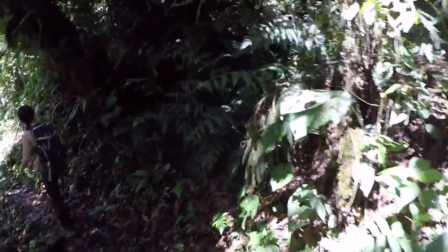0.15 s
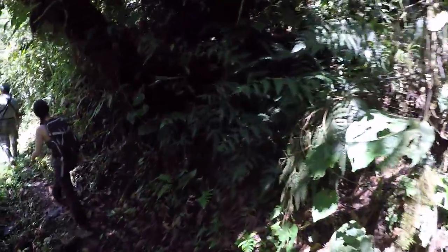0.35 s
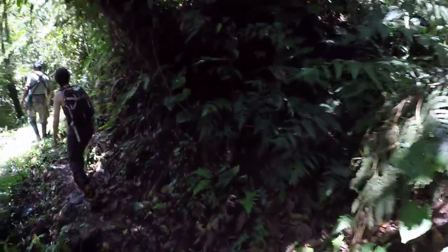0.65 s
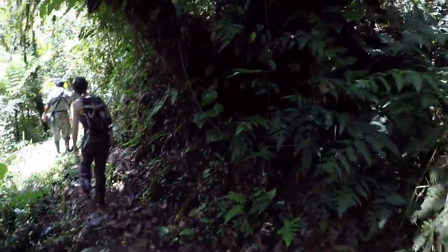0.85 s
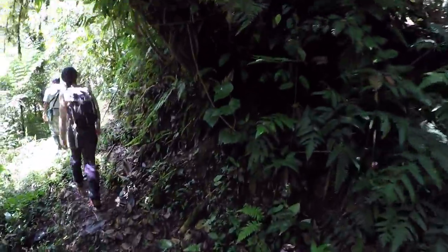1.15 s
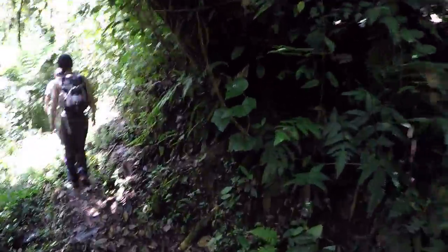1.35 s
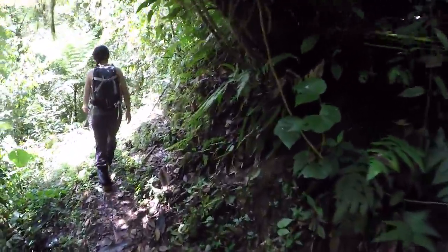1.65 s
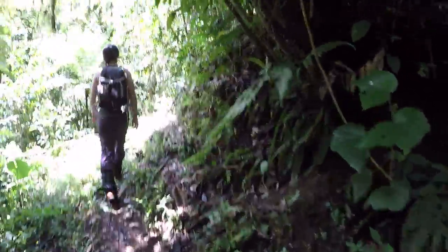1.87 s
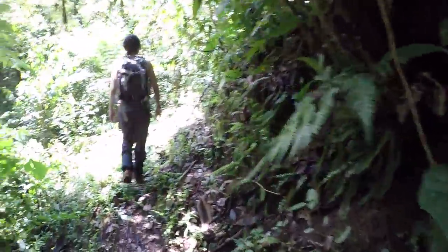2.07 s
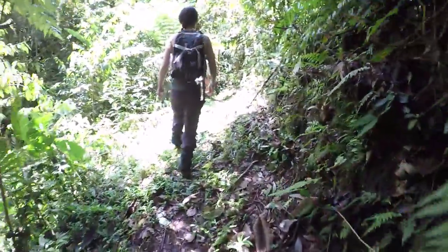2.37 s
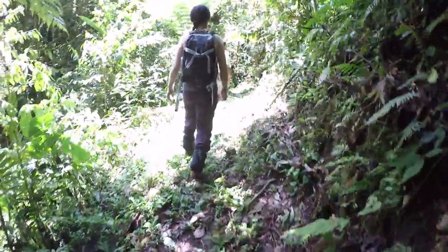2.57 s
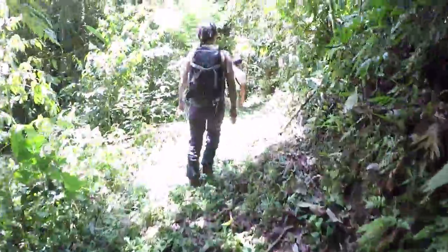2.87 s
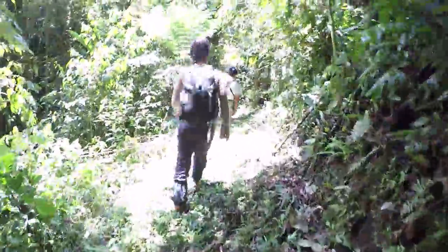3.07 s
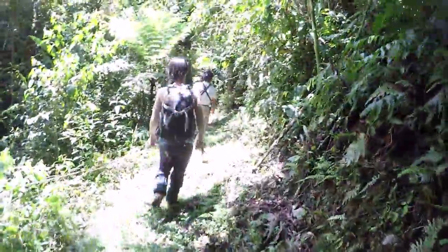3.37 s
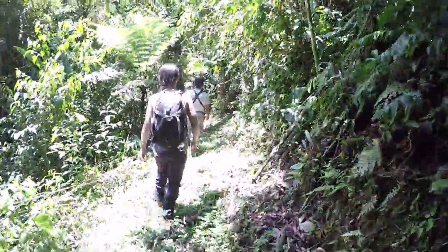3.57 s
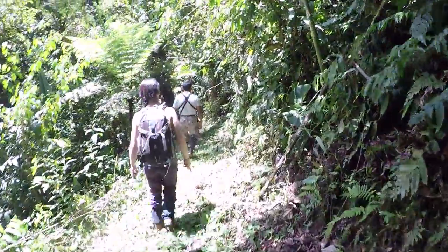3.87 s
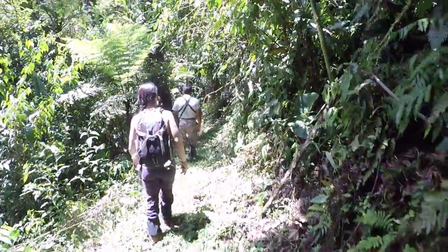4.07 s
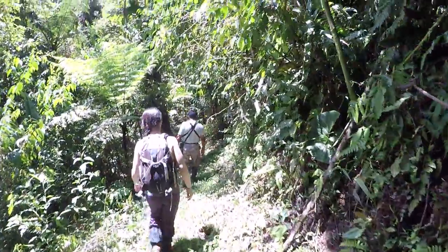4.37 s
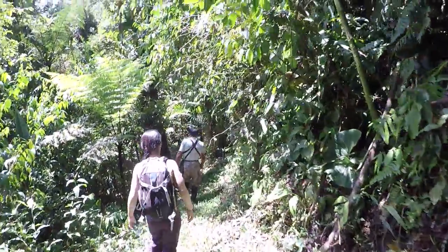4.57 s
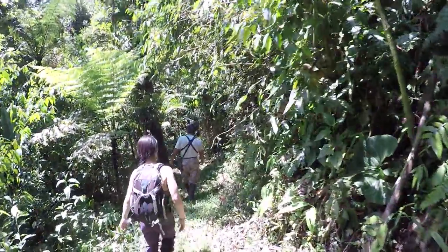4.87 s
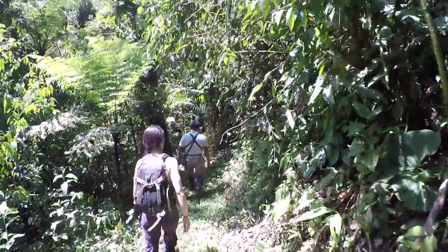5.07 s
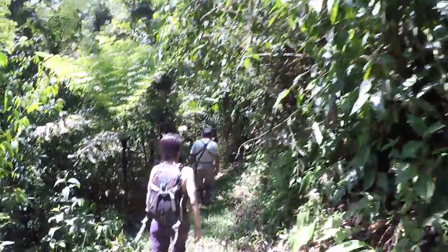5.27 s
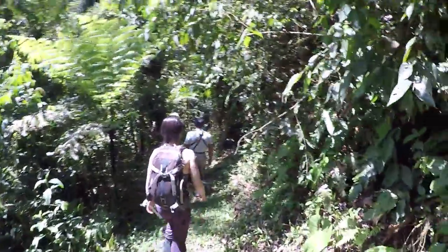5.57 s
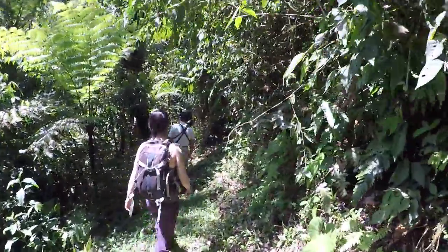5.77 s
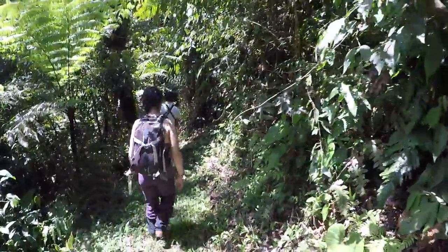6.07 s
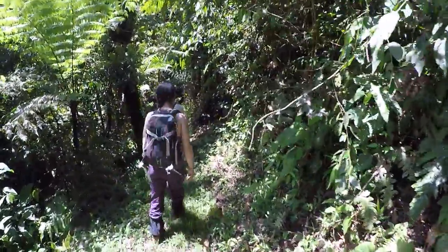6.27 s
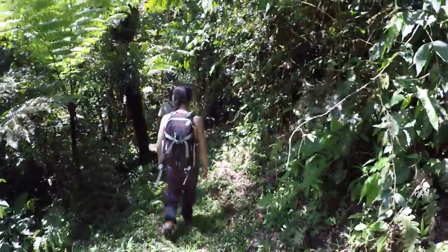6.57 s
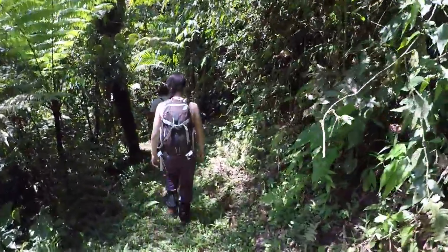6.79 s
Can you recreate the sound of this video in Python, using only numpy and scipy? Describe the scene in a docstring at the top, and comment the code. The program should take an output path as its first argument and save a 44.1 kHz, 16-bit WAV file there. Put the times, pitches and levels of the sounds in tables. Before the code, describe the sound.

Loud shrill cicada chorus in dense forest fades, then swells to a piercing buzz, with soft footsteps, dry ticks and handling rubs close by.

```python
"""Dense tropical forest, on a trail: cicadas shrill in a chorus that fades, then swells as a hand-held camera
follows walkers. Far off, fast tymbal clicks blur among the trees; near singers are click trains ringing
a hollow abdomen, heard as combs of thin, slowly sagging tones, with single harmonics flaring up.
Close by are soft steps (damped booms over crushed earth), a few ticks, brushed leaves, and two faint raspy
creaks within the rustling, perhaps of a strap. At the two microphone ports lie gritty rubs on the camera body,
its low whirr and handling rumble; far foliage hisses behind."""
import sys
import numpy as np
from scipy import signal
from scipy.fft import rfft, irfft, next_fast_len
from scipy.io import wavfile
from scipy.ndimage import map_coordinates

SR = 44100
rng = np.random.default_rng(int(sys.argv[2]) if len(sys.argv) > 2 else 0)


def unload_wav(signal):
    """Save mono or channel-first audio to the path in sys.argv[1] as 16-bit WAV at rate SR, clipped to [-1, 1]."""
    wavfile.write(
        sys.argv[1],
        SR,
        np.round(np.clip(np.atleast_2d(signal).T, -1, 1) * 32767).astype(np.int16),
    )


N = 305603  # length [samples]


def amp(db):
    """Decibels to gain."""
    return 10 ** (np.asarray(db) / 20)


def unit(x):
    """Scaled to rms 1."""
    return x / np.sqrt(np.mean(x ** 2) + 1e-20)


def along(points, hz):
    """Each column after the frequency, read on a log axis."""
    f, *cols = np.transpose(points)
    return [np.interp(np.log(hz + 1), np.log(f + 1), c) for c in cols]


def curves(rows):
    """One value per sample for each column after the time."""
    s, *cols = np.transpose(rows)
    return [np.interp(np.arange(N) / SR, s, c) for c in cols]


def wobble(rate):
    """A smooth random curve, rate knots a second."""
    knots = rng.standard_normal(int(N * rate / SR) + 4)
    return map_coordinates(knots, [np.arange(N) * rate / SR], order=2)


def filtered(x, response):
    """x times a complex response of frequency."""
    size = next_fast_len(N + 8192)
    return irfft(rfft(x, size) * response(np.fft.rfftfreq(size, 1 / SR)), size)[..., :N]


def coloured(x, spectrum):
    """x shaped by (frequency [Hz], gain [dB]) points."""
    return filtered(x, lambda hz: amp(along(spectrum, hz)[0]))


def noise():
    """Two unrelated white noises."""
    return rng.standard_normal((2, N))


def gritty(spread_db, grain_rate):
    """Noise broken into grains of uneven size."""
    return noise() * amp(spread_db * wobble(grain_rate))


def at_ports(pair, field):
    """Two unrelated signals reach the left and right ports with the field's coherence, phase and balance; rms 1."""
    def response(hz, sign):
        alike, lead, tilt_db = along(field, hz)
        share = np.sqrt((1 + sign * np.clip(alike, 0, 1)) / 2)
        left = amp(tilt_db / 2) * np.exp(.5j * lead)
        power = abs(left) ** 2 + abs(left) ** -2
        return share * np.array([left, sign / left]) / np.sqrt(power)

    in_step = filtered(pair[0], lambda hz: response(hz, 0.89))
    opposed = filtered(pair[1], lambda hz: response(hz, -0.99))
    return unit(in_step + opposed)


def swell(s, db, length):
    """A bell-shaped rise and fall around time s, its half length 2 ms or more."""
    return amp(db) * np.exp(-.5 * ((np.arange(N) / SR - s) / max(abs(length), .002)) ** 2)


def stroke(start, end, edge):
    """Rises, holds and falls, with ramps centred on start and end."""
    t = np.arange(N) / SR
    return np.clip(.5 + np.minimum(t - start, end - t) / max(edge, .001), 0, 1)


def click_train(at, spread_db):
    """Clicks of uneven size at the given fractional sample times."""
    at = at[(at >= 0) & (at < N - 1)]
    whole, part = at.astype(int), at % 1
    sizes = amp(spread_db * rng.standard_normal(len(at)))
    # each click is shared between its two neighbouring samples
    train = np.bincount(whole, sizes * (1 - part), N) + np.bincount(whole + 1, sizes * part, N)
    return train - train.mean()


def cracks(rate):
    """Two streams of irregular cracks, rate a second; rms 1."""
    count = int(rate * N / SR)
    return unit(np.array([click_train(rng.uniform(0, N, count), spread_db=3.5) for _ in range(2)]))


def echoes(t60, direct):
    """The paths from one perch: a direct one and a tail scattered by the trees."""
    t = np.arange(SR // 3) / SR
    paths = unit(rng.standard_normal(len(t)) * amp(-60 * t / t60)) / np.sqrt(len(t))
    paths[0] += direct
    return paths


def tymbals(click_rate, jitter, forest_t60, count):
    """Two groups of count far insects, each clicking at its own wandering rate."""
    groups = np.zeros((2, N))
    for group in groups:
        for _ in range(count):
            rate = click_rate * np.exp(rng.normal(0, .15))
            order = np.arange(int(1.2 * rate * N / SR))
            drift = .05 * np.sin(2 * np.pi * (order / rate * rng.uniform(.1, .4) + rng.random()))
            at = np.cumsum(1 + drift + rng.normal(0, jitter, len(order))) / rate * SR
            clicks = click_train(at, spread_db=2)
            group += signal.oaconvolve(clicks, echoes(forest_t60, direct=0.61))[:N]
    return groups


# loudness of the far chorus, one fade and one long swell: (time [s], level [dB])
CHORUS_LEVEL = [(0, -21.5), (.4, -23.5), (.8, -28.5), (1.5, -32), (2.1, -32.5), (2.9, -30), (5.0, -20.5),
                (6.93, -17.5)]
# colour of all tymbals together, and of their overtones: (frequency [Hz], gain [dB])
MASS_COLOUR = [(2400, -48), (2950, -24), (3180, -12.5), (3330, -7), (3570, -4.5), (3720, -5.5), (4100, -4),
               (4580, 0), (4900, 0), (5400, -2.5), (6200, -8), (6650, -13.5), (7300, -17.5), (8200, -55)]
OVERTONE_COLOUR = [(7000, -32), (7600, -29), (8600, 4), (10000, 7), (11200, -26), (13000, -2), (15000, 6),
                   (16000, -8)]
# how cicadas, far and near, reach the two ports:
# (frequency [Hz], coherence [0-1], left lead [rad], left over right [dB])
CANOPY_FIELD = [(2600, 1, 0, -8), (3370, 0.8, 0.5, 0), (4340, 0.73, 0.47, -0.3), (4990, 0.7, 1.32, 1.5),
                (5930, 0.56, 1.4, 4), (6430, 0.9, 1.08, 2), (7780, 0.88, 4, -1), (11000, .15, 2.5, -1),
                (14500, 0, 6, 4)]


def far_chorus():
    """Far tymbal clicks blur into a mass; it and its faint overtones follow one loudness curve."""
    chorus_db = curves(CHORUS_LEVEL)[0]
    clicks = tymbals(click_rate=170, jitter=.08, forest_t60=0.45, count=6)
    mass = at_ports(coloured(clicks, MASS_COLOUR), CANOPY_FIELD)
    overtones = at_ports(coloured(clicks, OVERTONE_COLOUR), CANOPY_FIELD)
    mass_gain = amp(chorus_db + 0.64 * wobble(22))
    overtone_gain = amp(chorus_db - 35.0 + 2.1 * wobble(12))
    return mass_gain * mass + overtone_gain * overtones


# pushes of a narrower voice in the chorus: (time [s], level [dB])
VOICE_SURGES = [(1.75, -38.5), (2.36, -43), (2.71, -39), (3.28, -35), (3.78, -34), (4.68, -32)]
# colour of that voice: (frequency [Hz], gain [dB])
VOICE_COLOUR = [(3600, -39), (4250, -6), (4550, 1.5), (4850, -2), (5200, -5), (6200, -35), (7500, -60)]
SURGE_S, SURGE_REST_DB = 0.058, -44.5  # half length of a surge [s]; level between surges [dB]


def surging_voice():
    """A few steadier tymbals in a narrow band push forward in surges."""
    clicks = tymbals(click_rate=130, jitter=0.013, forest_t60=0.51, count=2)
    voice = at_ports(coloured(clicks, VOICE_COLOUR), CANOPY_FIELD)
    return voice * (amp(SURGE_REST_DB) + sum(swell(s, db, SURGE_S) for s, db in VOICE_SURGES))


SAG_HZ, RATE_WAVER = 2.14, .0015  # tymbal rate lost per e-fold of the song's age [Hz]; unsteadiness [share]
RUN_DOWN_S, RUN_DOWN_PER_S = .36, .45  # last moments of a song [s]; share of the rate lost per s [1/s]


def tymbal_cycles(start, end, hz):
    """Cycles sung so far: the rate starts high, sags with the log of the song's age and runs down at its end."""
    t = np.arange(N) / SR
    rate = hz - SAG_HZ * np.log(np.maximum(t - start, .03))
    rate = rate * (1 - RUN_DOWN_PER_S * np.clip(t - end + RUN_DOWN_S, 0, RUN_DOWN_S))
    return np.cumsum(rate * (1 + RATE_WAVER * wobble(70))) / SR


# colour of the hollow abdomen: (frequency [Hz], gain [dB])
ABDOMEN_COLOUR = [(2500, -55), (3150, -17.5), (3330, -10), (3450, -6), (3575, -0.5), (3700, -17),
                  (4200, -21), (4570, 5.5), (4800, 3.5), (5500, -0.5), (6200, -3), (6650, -13.5),
                  (7300, -37), (8200, -52)]
SONG_ATTACK_S, SONG_RELEASE_S = 0.17, 0.76


def near_cicada(start, end, db, cycles):
    """One song: two tymbals buckle in turn, the second more weakly, and ring the hollow abdomen."""
    t = np.arange(N) / SR
    effort = np.clip(np.minimum((t - start) / SONG_ATTACK_S, (end - t) / SONG_RELEASE_S), 0, 1)

    def tymbal(phase):
        """Clicks at the same phase of every cycle."""
        at = np.interp(np.arange(int(cycles[-1])) + phase, cycles, np.arange(N))
        return click_train(at, spread_db=3.2)

    train = tymbal(0) + .45 * tymbal(.488)
    pair = [signal.oaconvolve(train, echoes(t60=0.26, direct=0.27))[:N] for _ in range(2)]
    return amp(db) * effort * at_ports(coloured(np.array(pair), ABDOMEN_COLOUR), CANOPY_FIELD)


FLARE_FADE_S = 0.11  # a flaring harmonic fades in and out


def flare(start, end, db, harmonic, cycles):
    """One harmonic of a song stands out for a while, quivering."""
    level = amp(db + 3.2 * wobble(45) - 1.5) * stroke(start, end, FLARE_FADE_S)
    return np.sqrt(2) * level * np.sin(2 * np.pi * round(harmonic) * cycles + .6 * wobble(80))


# songs of near cicadas, the first two already under way, before NEAR_DB:
# (start [s], end [s], level [dB], tymbal rate one second in [Hz])
NEAR_SONGS = [(-6.5, 1.05, -26.5, 126.6), (-3, .55, -31, 134), (3.7, 8, -34, 131), (4.5, 8, -31, 131.4),
              (5.6, 8, -24.5, 126.66)]
# harmonics of the nearest song, before their quiver: (start [s], end [s], level [dB], harmonic number)
HARMONIC_FLARES = [(5.44, 5.74, -33, 27), (6.36, 6.54, -41, 28), (5.68, 5.9, -25.5, 35),
                   (5.752, 6.0, -41, 37), (6.018, 6.29, -28.5, 28), (5.92, 6.36, -33, 43),
                   (5.2, 6.8, -40, 41), (6.082, 6.4, -35, 39), (6.8, 6.3, -34, 36), (6.4, 6.5, -31, 47),
                   (6.43, 6.8, -34, 26), (6.443, 7.3, -27, 36), (6.655, 7.0, -33, 37), (6.72, 7.0, -30, 28)]
NEAR_DB = -0.5  # all near songs together, without the flares


def singers():
    """The near cicadas; harmonics of the last and nearest one flare up."""
    cycles = [tymbal_cycles(start, end, hz) for start, end, _, hz in NEAR_SONGS]
    songs = sum(near_cicada(start, end, db + NEAR_DB, sung)
                for (start, end, db, _), sung in zip(NEAR_SONGS, cycles))
    return songs + sum(flare(*row, cycles[-1]) for row in HARMONIC_FLARES)


# landings, before scatter and bass loss:
# (start [s], boom level [dB], length [s], boom pitch [Hz], t60 [s], left over right [dB])
LANDINGS = [(.837, -27, .006, 202, .025, -6), (1.441, -25, 0.0086, 230, 0.019, 0),
            (1.906, -25, 0.013, 200.1, 0.029, -2), (2.354, -24, .085, 170, 0.023, -11),
            (3.866, -19.5, .004, 215, 0.023, 9), (3.878, -17.5, 0.016, 226, 0.043, 3),
            (5.463, -15.5, .004, 158, .06, 20), (5.873, -17.5, 0.014, 217, 0.044, 12),
            (5.898, -14.5, 0.015, 230, 0.048, 9), (5.933, -20, 0.021, 278, .025, 5),
            (5.961, -17, .012, 240, 0.045, 6), (6.062, -13.5, 0.0068, 215, 0.022, 8),
            (6.108, -24, .005, 260, .02, 4), (6.199, -23, .008, 216, 0.027, 1),
            (6.272, -27, .02, 221, 0.034, 2)]
# colour of crushed earth: (frequency [Hz], gain [dB])
THUD_COLOUR = [(30, -39), (80, -28), (120, -10), (160, -8), (240, 5), (330, -12.5), (520, 1), (900, -44),
               (2000, -62)]
# how crushed earth and handling rumble reach the ports:
# (frequency [Hz], coherence [0-1], left lead [rad], left over right [dB])
GROUND_FIELD = [(50, 0.59, 0.5, .3), (100, 0.66, 0.5, .5), (170, 0.38, -4.5, 7.2), (332, 0.85, -7, 8.3),
                (464, 1, -3, 7.9), (800, 1, -5.5, 1)]
SLIP_S, SLIP_SCATTER = .014, .15  # the landing weight settles in small jerks: spacing [s], unevenness [share]
THUD_DB = -14  # crushed earth, against the boom
EDGE_S = 0.017  # a footfall's load, or a rub, comes on and lets go this fast


def footfalls():
    """Weight lands on soft earth and settles in jerks, each a short damped boom, while the soil crushes."""
    booms, t = np.zeros((2, N + SR)), np.arange(SR // 10) / SR
    for start, db, length, hz, t60, tilt_db in LANDINGS:
        chance = rng.standard_normal((12, 3))  # spacing, size and pitch of each jerk
        lags = np.cumsum(np.r_[0, SLIP_S * abs(1 + SLIP_SCATTER * chance[1:, 0])])
        balance = amp([[tilt_db / 2], [-tilt_db / 2]])
        for lag, (_, size, pitch) in zip(lags[lags <= abs(length)], chance):
            boom = amp(db + size - 60 * t / t60) * np.sin(2 * np.pi * hz * np.exp(.04 * pitch) * t)
            booms[:, round((start + lag) * SR):][:, :len(t)] += balance * boom
    load = sum(amp(db + THUD_DB) * stroke(start, start + length, EDGE_S)
               for start, db, length, *_ in LANDINGS)
    crush = at_ports(coloured(gritty(spread_db=2.0, grain_rate=98), THUD_COLOUR), GROUND_FIELD)
    return booms[:, :N] + load * crush


# rubs on the camera body, before bass loss: (start [s], end [s], level [dB], treble edge [Hz])
BODY_RUBS = [(.801, 0.851, -26, 1150), (0.854, 0.891, -24, 1150), (0.984, 1.033, -21, 1150),
             (1.063, 1.079, -28, 700), (1.428, 1.482, -30, 1200), (1.71, 1.776, -34.5, 700),
             (1.888, 1.926, -32, 600), (2.257, 2.28, -24.5, 900), (3.83, 3.912, -29, 796),
             (3.957, 3.997, -29.5, 1000), (5.195, 5.236, -29.5, 700), (5.28, 5.35, -27.5, 1200),
             (5.448, 5.482, -20, 650), (5.481, 5.522, -16.5, 1590), (5.527, 5.566, -26, 744),
             (5.598, 5.651, -26.5, 650), (5.667, 5.692, -23, 1100), (5.867, 5.927, -23, 450),
             (5.929, 5.978, -21.5, 604), (6.051, 6.116, -23.5, 805), (6.165, 6.21, -29.5, 600),
             (6.248, 6.298, -28, 600)]
# colour of a rub: (frequency [Hz], gain [dB])
RUB_COLOUR = [(100, -14.5), (180, 0), (450, -1), (650, -4.5), (850, 4.5), (1100, -6.5), (1700, -9),
              (4000, -45)]
# sound through the camera body drives the ports nearly in opposition:
# (frequency [Hz], coherence [0-1], left lead [rad], left over right [dB])
BODY_FIELD = [(60, .75, 3.5, -14), (164, 0.36, -2.5, -4.5), (260, 0.73, -3, 0.5), (460, 1, -3, 8.5),
              (620, 1, -2.5, 0.5), (920, 0.97, -3, 0.5), (1260, 1, -2.5, -4.5)]
CRUNCH_RATE, CRUNCH_DB = 500, -2  # sharp grains per s in a rub; their gain in the mix with its noise [dB]
CATCH_RATE, CATCH_DB = 90, 1.3  # catching and slipping: knots per s, depth [dB]


def body_rubs():
    """Rubs on the camera body (strap, hand or finger): gritty, catching and slipping, each with its treble edge."""
    grains = gritty(spread_db=3.5, grain_rate=220) + amp(CRUNCH_DB) * cracks(CRUNCH_RATE)
    grit = at_ports(coloured(grains * amp(CATCH_DB * wobble(CATCH_RATE)), RUB_COLOUR), BODY_FIELD)

    def dulled(hz):
        """The grit below a treble edge, rms 1."""
        return unit(signal.sosfilt(signal.butter(2, hz, fs=SR, output="sos"), grit))

    return sum(amp(db) * stroke(start, end, EDGE_S) * dulled(hz) for start, end, db, hz in BODY_RUBS)


# the footfalls and rubs are thinned steeply below about 130 Hz: (frequency [Hz], gain [dB])
DEEP_BASS_LOSS = [(60, -18), (106, -19), (134, 0)]


def footfalls_and_rubs():
    """Landings on the earth and rubs on the camera body, both thinned in the bass."""
    return coloured(footfalls() + body_rubs(), DEEP_BASS_LOSS)


# leaves brushed or crushed: (time [s], level [dB], half length [s])
LEAF_RUSTLES = [(1.595, -36, 0.027), (3.11, -35, .018), (3.457, -29, .024), (3.451, -34, 0.0017),
                (3.464, -36, 0.0018), (3.538, -30, 0.0027), (3.54, -32.5, .022), (3.598, -29, 0.0032),
                (3.655, -40, 0.027), (3.55, -42, .09), (5.2, -36.5, 0.027), (5.32, -31, 0.018)]
# colour of the leaves: (frequency [Hz], gain [dB])
LEAF_COLOUR = [(800, -27), (1800, -5), (4000, 2.5), (7000, 4), (8500, -7.5), (10500, -14), (12500, -25),
               (15000, -31)]
# how leaves, near and far, reach the ports:
# (frequency [Hz], coherence [0-1], left lead [rad], left over right [dB])
AIR_FIELD = [(1400, 0.26, 0.54, 0.5), (1780, 0.6, 0.47, 1), (2160, 0.17, 0.0058, 1.5),
             (3500, 0.99, 0.048, 1.5), (8100, 0.07, 0.016, -3), (12000, .1, 0, -1)]
CRACKLE_RATE, CRACKLE_DB = 260, 2  # cracks per s in a rustle; their gain in the mix with the swish [dB]


def leaves():
    """Dry leaves swish raggedly and give off small irregular cracks."""
    rustle = gritty(spread_db=-0.5, grain_rate=98) + amp(CRACKLE_DB) * cracks(CRACKLE_RATE)
    return sum(swell(*row) for row in LEAF_RUSTLES) * at_ports(coloured(rustle, LEAF_COLOUR), AIR_FIELD)


# faint raspy creaks: (time [s], rms level at the crest [dB], half length [s], mean pitch [Hz])
FAINT_CREAKS = [(5.183, -37.5, .014, 1950), (5.315, -39.5, 0.0078, 1880)]


def creaks():
    """Two faint creaks within the rustling, perhaps of a strap: brief tones, raspy as their pitch wavers fast."""
    clock = np.cumsum(1 + 0.0458 * wobble(620)) / SR
    return np.sqrt(2) * sum(swell(s, db, length) * np.sin(2 * np.pi * hz * clock)
                            for s, db, length, hz in FAINT_CREAKS)


# small dry knocks underfoot, before their colouring:
# (time [s], peak level [dB], gain at the right port against the left)
DRY_KNOCKS = [(.932, -26, 0.99), (1.016, -24, 0.62), (1.020, -20, 0.51), (1.469, -25, .4),
              (1.909, -27, -.4), (1.956, -12, -0.28), (2.010, -7, -.4), (2.264, -26, .5), (2.699, -29, .5),
              (3.865, -18, -.8), (3.878, -12, -0.71), (3.985, -23, -.6), (5.512, -16, -.7),
              (5.873, -14, -0.67), (5.962, -12, -0.5), (6.062, -20, -.5)]
# modes of a knock, before scatter: (frequency [Hz], level [dB], t60 [s])
KNOCK_MODES = [(347, 1.5, 0.024), (610, 9, 0.0098), (1210, 4, 0.016), (1650, -13, .008)]


def ticks():
    """Small dry knocks, each a few quickly damped modes, pitched differently every time."""
    out, t = np.zeros((2, N + SR)), np.arange(SR // 10) / SR
    for s, db, right in DRY_KNOCKS:
        ring = 0
        for hz, level, t60 in KNOCK_MODES:
            decay = amp(level + rng.normal(0, 2.5) - 60 * t / t60)
            ring = ring + decay * np.cos(2 * np.pi * hz * np.exp(rng.normal(0, 0.15)) * t)
        knock = amp(db) * ring / abs(ring).max()
        out[:, round(s * SR):][:, :len(t)] += np.outer([1, right], knock)
    return coloured(out[:, :N], [(80, -25), (260, 7.0), (1700, 1), (4000, -22)])


# level of the whirr before its slight wobble: (time [s], level [dB])
WHIRR_LEVEL_CURVE = [(0, -38), (.8, -37), (4, -36.5), (5.5, -36), (6.5, -39)]
# colour of the whirr: (frequency [Hz], gain [dB])
WHIRR_COLOUR = [(20, -34), (60, -52), (105, -65), (128, -15), (148, 0), (175, 1), (215, 0), (330, -2),
                (490, -2), (650, -3.5), (1000, -5), (1400, -14), (2200, -35), (4000, -54)]
# how the whirr reaches the ports: (frequency [Hz], coherence [0-1], left lead [rad], left over right [dB])
WHIRR_FIELD = [(130, 0.32, -0.5, -1), (350, 0.62, 0.56, 3), (600, 0.18, 0.6, 3), (830, 0.57, 3, 3),
               (1240, 0.33, 1.9, -3)]


def camera_whirr():
    """A low whirr in the camera body, made of coloured noise."""
    level = amp(curves(WHIRR_LEVEL_CURVE)[0] + 0.34 * wobble(11.0))
    return level * at_ports(coloured(noise(), WHIRR_COLOUR), WHIRR_FIELD)


# the hand shifts on the grip and its rumble dies away:
# (time [s], level before wobble [dB], rise [dB/s], fall [dB/s])
HAND_SHIFTS = [(2.42, -51, 35, 120), (5.55, -38.5, 125, 30), (5.93, -37.5, 97, 19)]
# colour of the handling rumble: (frequency [Hz], gain [dB])
RUMBLE_COLOUR = [(15, 6.5), (30, 0.5), (60, -0.5), (100, -2), (160, -14), (300, -46)]
STILL_HAND_DB = -91  # rumble of a quiet grip, before wobble


def handling_rumble():
    """Low noise from the hand on the grip: each shift builds up and dies away."""
    t = np.arange(N) / SR
    grip = amp(STILL_HAND_DB) + sum(amp(db - np.maximum(rise * (s - t), fall * (t - s)))
                                    for s, db, rise, fall in HAND_SHIFTS)
    return grip * amp(2.2 * wobble(12)) * at_ports(coloured(noise(), RUMBLE_COLOUR), GROUND_FIELD)


# level of the far foliage before its wobble: (time [s], level [dB])
FOLIAGE_LEVEL = [(0, -37.5), (1.3, -38), (2.5, -36), (5.3, -34.5), (6.93, -37.5)]
# colour of its hiss: (frequency [Hz], gain [dB])
FOLIAGE_COLOUR = [(600, -19.5), (1300, 0), (1800, 1.5), (2300, -1.5), (3000, 0), (6000, -3), (7500, -10),
                  (9800, -19), (11300, -26), (15000, -30)]


def foliage_hiss():
    """Far foliage hisses: broad noise of gently wandering level."""
    level = amp(curves(FOLIAGE_LEVEL)[0] + 0.94 * wobble(11))
    return level * at_ports(coloured(noise(), FOLIAGE_COLOUR), AIR_FIELD)


def scene():
    """Everything heard on the trail."""
    cicadas = far_chorus() + surging_voice() + singers()
    close_by = footfalls_and_rubs() + leaves() + creaks() + ticks()
    background = camera_whirr() + handling_rumble() + foliage_hiss()
    return cicadas + close_by + background


TOP_HZ = 15280  # the camera's band limit


def record(dry):
    """The camera keeps nothing above its band limit."""
    return filtered(dry, lambda hz: hz < TOP_HZ)


dry = scene()
out = record(dry)
unload_wav(out)
```